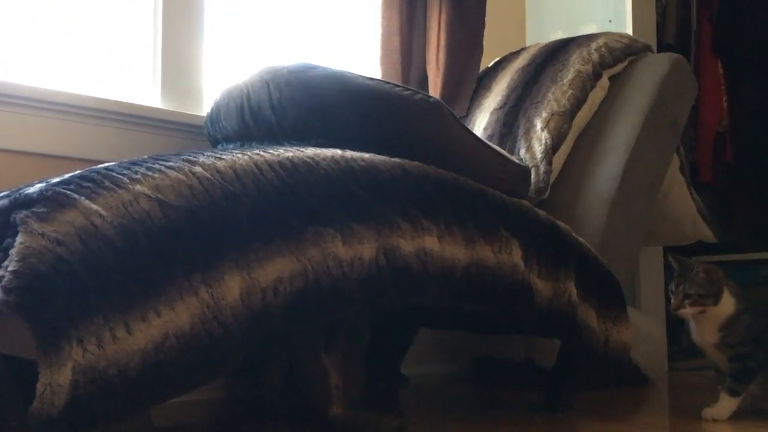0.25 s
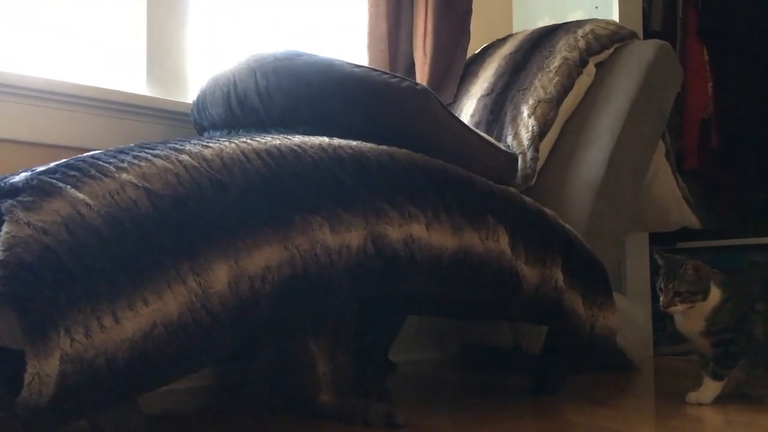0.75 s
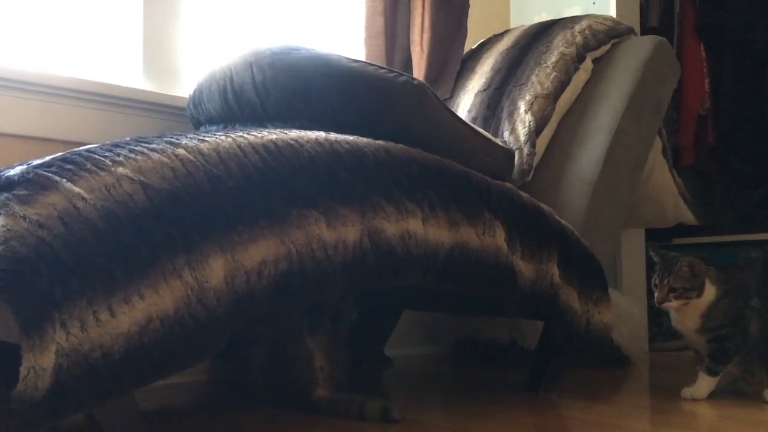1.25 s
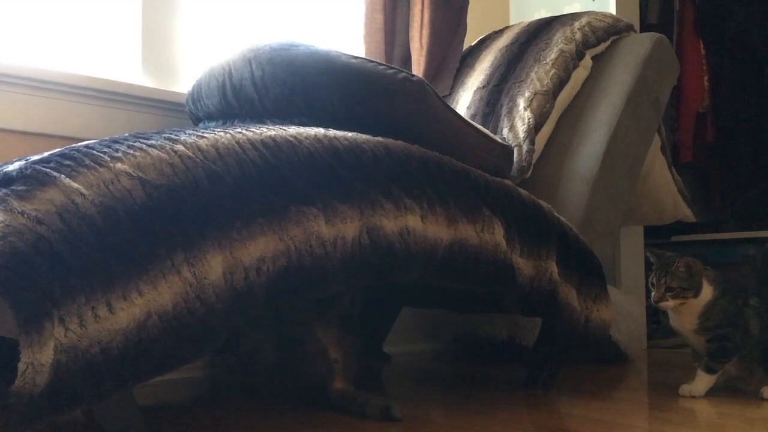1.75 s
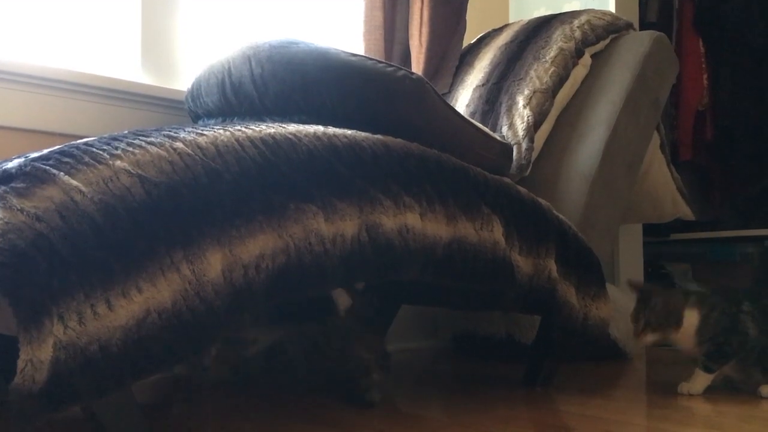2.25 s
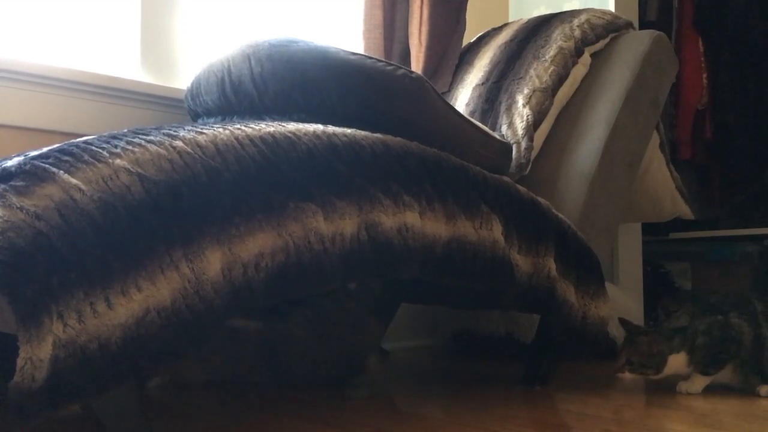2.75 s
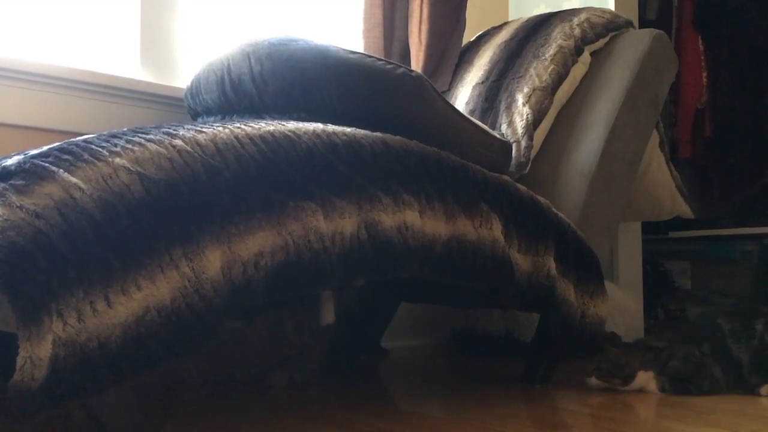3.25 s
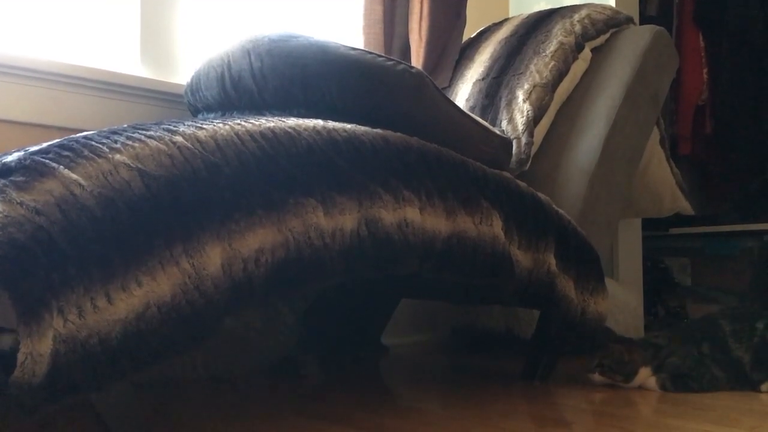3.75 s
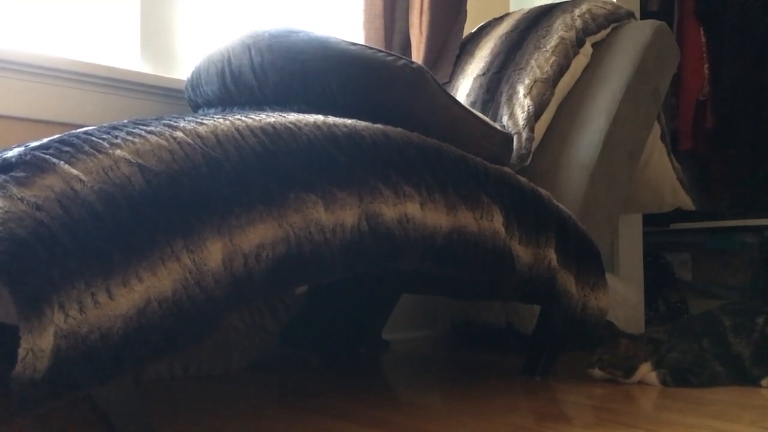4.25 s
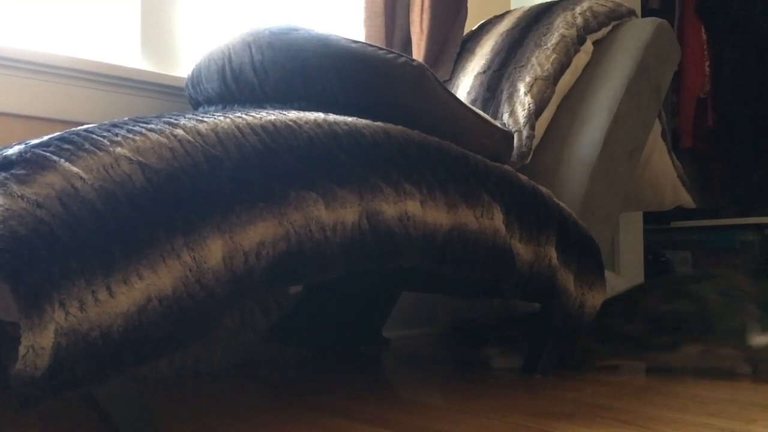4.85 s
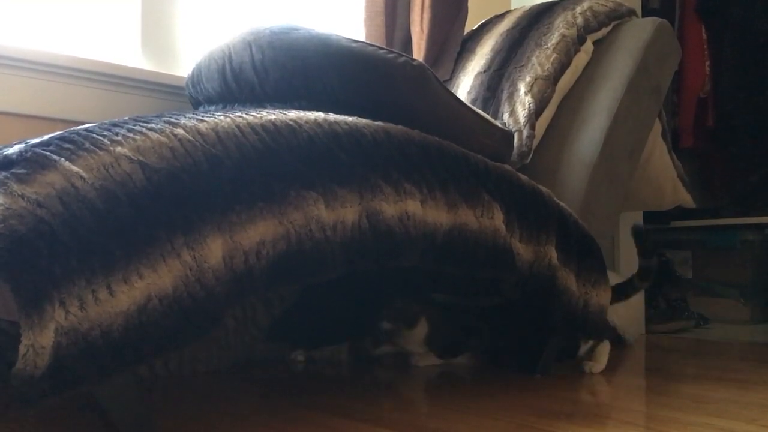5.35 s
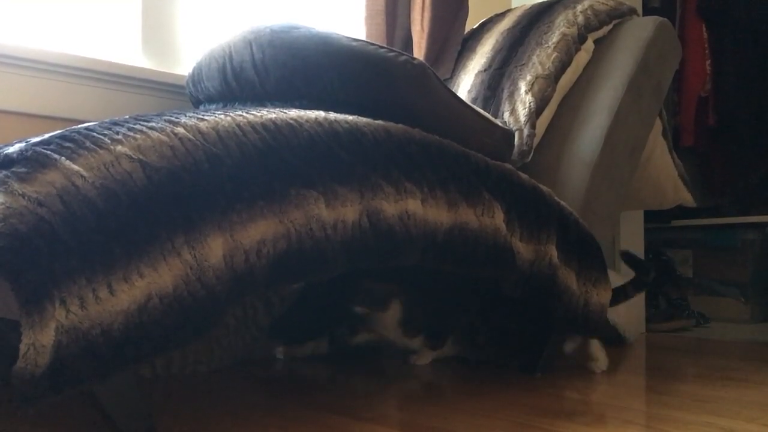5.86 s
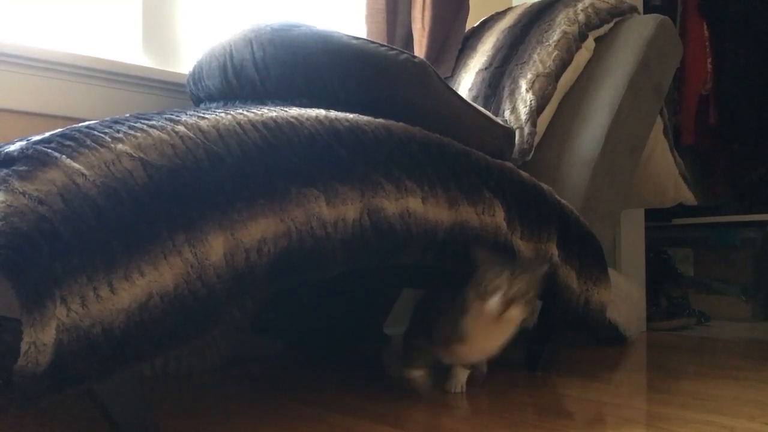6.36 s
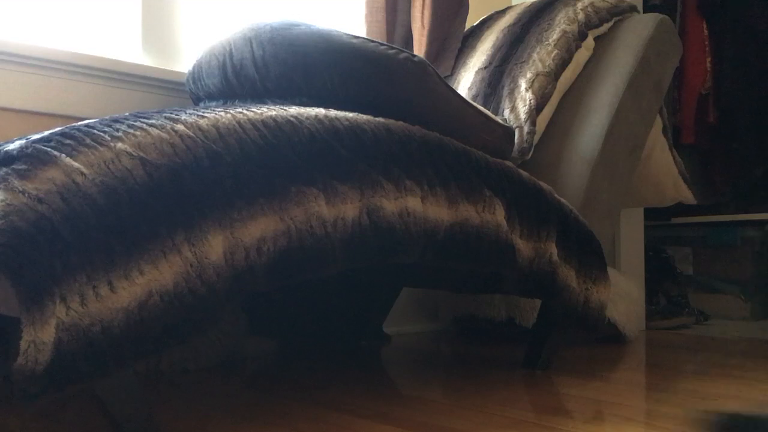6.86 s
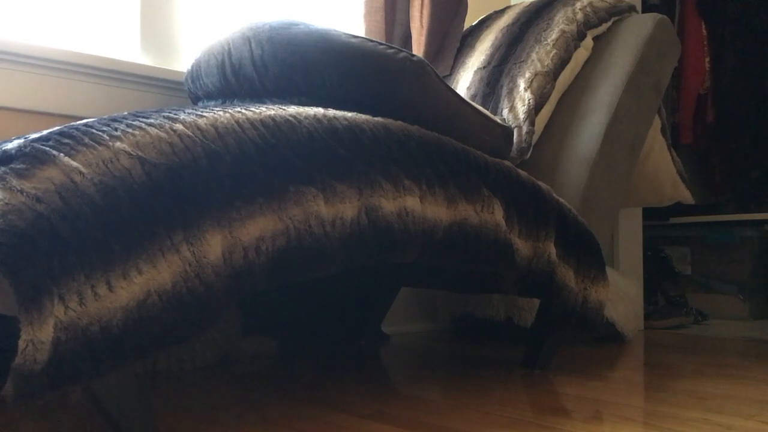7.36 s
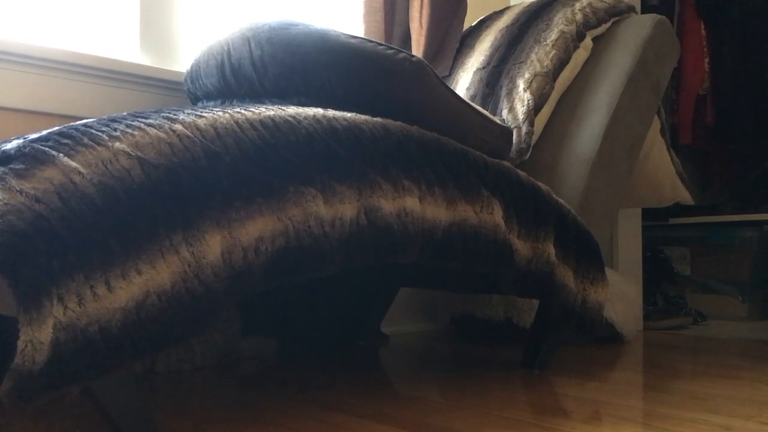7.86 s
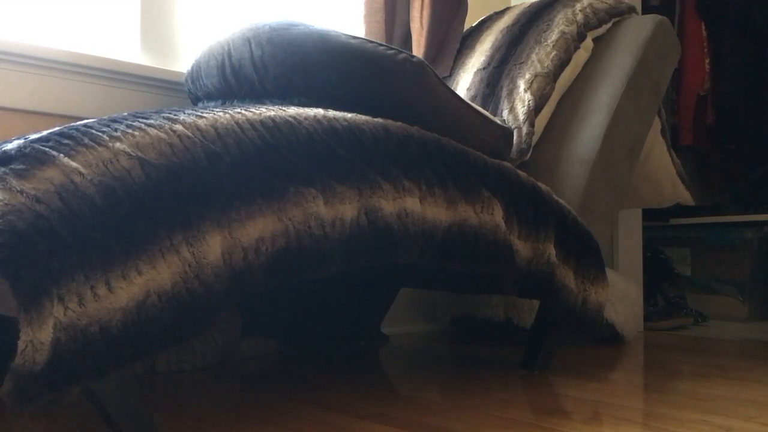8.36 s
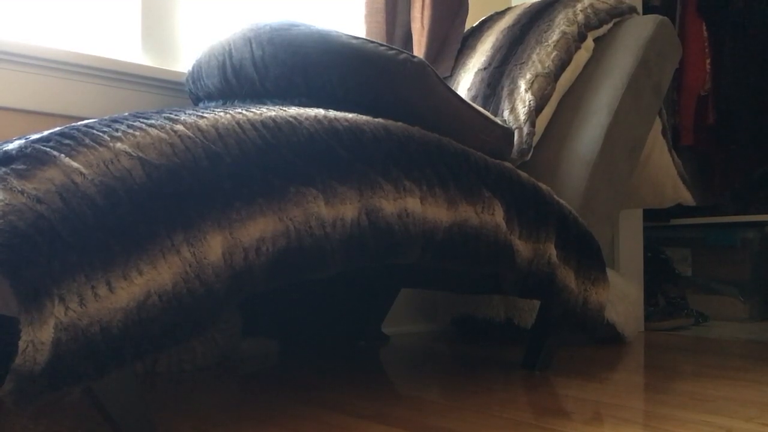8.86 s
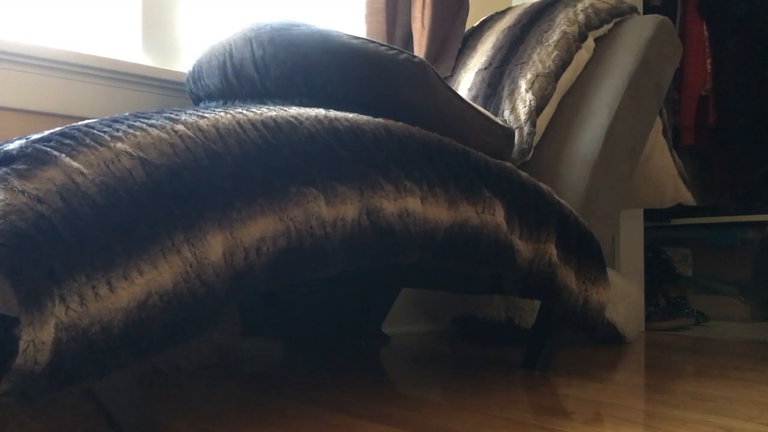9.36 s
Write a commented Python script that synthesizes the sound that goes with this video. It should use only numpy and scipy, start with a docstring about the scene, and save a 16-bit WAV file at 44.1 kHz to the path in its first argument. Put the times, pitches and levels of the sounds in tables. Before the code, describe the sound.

Close, soft scuffling of cats on wooden boards, with muffled bumps, claw clicks and brushing fur coming in bursts, then near stillness.

```python
"""Two cats tussle on a hardwood floor under a couch, close to a microphone, in a small quiet room.
Rumble and hiss (shaped noise) run throughout; strokes of fur and pads (swelling noise), thuds of the joists
(sagging cycles) and paw knocks (falling chirps with a room tail) begin at once. Claw ticks (filtered clicks
with a gritty skid) join before 2 s and one thin squeak (a wobbling tone) comes near 3 s. The tussle crowds
around 5 s and from 6 to 7.7 s; then come small shifts of weight and, after 9.3 s, a few last touches."""
import sys
import numpy as np
from scipy import signal
from scipy.fft import rfft, irfft
from scipy.io import wavfile
from scipy.ndimage import uniform_filter1d

SR = 44100
rng = np.random.default_rng(int(sys.argv[2]) if len(sys.argv) > 2 else 0)


def waveform_to_disk(signal):
    """Save audio, clipped to [-1, 1], as 16-bit WAV at the path in sys.argv[1]."""
    frames = np.transpose(np.atleast_2d(signal))
    scaled = np.clip(frames, -1, 1) * 32767
    samples = np.round(scaled).astype(np.int16)
    wavfile.write(sys.argv[1], SR, samples)


N = 423360


def gain_of(db):
    """Amplitude ratio: 20 dB is a factor of ten."""
    return 10 ** (np.asarray(db) / 20)


def evened(x):
    """Power normalisation: scales to rms 1."""
    return x / np.sqrt(np.mean(x ** 2) + 1e-20)


def read(points, hz):
    """Interpolation along a logarithmic frequency axis."""
    point_hz, value = np.transpose(points)
    return np.interp(np.log(hz + 1), np.log(point_hz + 1), value)


def add(mix, s, sound):
    """Linear superposition: mixes a sound in from time s."""
    part = mix[max(round(s * SR), 0):][:len(sound)]
    part += sound[:len(part)]


def coloured(x, spectrum):
    """Zero-phase filtering: multiplies the Fourier transform of x by a spectrum in dB."""
    bin_hz = np.fft.rfftfreq(len(x), 1 / SR)
    return irfft(rfft(x) * gain_of(read(spectrum, bin_hz)), len(x))


def flicker(span_s, depth_db):
    """Amplitude modulation: a random gain of rms depth_db that changes within about span_s."""
    size = round(span_s * SR)
    smooth = uniform_filter1d(uniform_filter1d(rng.standard_normal(N), size), size)
    return gain_of(depth_db * evened(smooth))


def rumble_db(t):
    """Slow envelope: level of the rumble at times t, linear in dB between points."""
    # low rumble of the house and of small movements: (time [s], level [dB])
    rumble_levels = [(0.0, -69), (0.35, -61), (1.2, -62.5), (1.6, -77), (1.95, -68), (2.32, -67.5),
                     (3.02, -54), (4.3, -70), (4.85, -62), (5.05, -47.5), (5.43, -62), (5.8, -65),
                     (6.26, -55.5), (7.25, -55.5), (7.75, -55), (7.95, -60), (8.37, -62.5), (9.6, -63)]
    return np.interp(t, *np.transpose(rumble_levels))


def background():
    """Spectral shaping of noise: a lumpy low rumble over a steady hiss."""
    # power balance of the rumble: (frequency [Hz], level [dB per Hz])
    rumble_shape = [(20, -42), (40, 6.5), (70, 6.5), (110, 4.5), (180, 5.5), (260, -13.5), (400, -43.5)]
    # still air and microphone: (frequency [Hz], level [dB])
    hiss_shape = [(24, -34.5), (40, -3.5), (66, -15.5), (156, -7), (358, -17.5), (523, -23), (1060, -29),
                  (1890, -31), (5050, -35.5), (6500, -35), (10500, -39.5), (11900, -39.5), (15300, -42),
                  (16500, -60)]
    hiss_db = -70
    rumble = evened(coloured(rng.standard_normal(N), rumble_shape) * flicker(0.027, 2.0))
    hiss = evened(coloured(rng.standard_normal(N), hiss_shape))
    return gain_of(rumble_db(np.arange(N) / SR)) * rumble + gain_of(hiss_db) * hiss


def boards(x):
    """Modal resonance of the floor boards: each mode has peak gain 1 before its own level."""
    # modes of the boards: (frequency [Hz], bandwidth [Hz], level [dB])
    modes = [(335, 25, -8), (450, 160, 0), (551.4, 45, 11.5), (847, 34, -5.5), (1160, 14, -9),
             (1590, 13, -12), (2060, 24, -16.5)]
    ringing = 0
    for hz, width_hz, db in modes:
        b, a = signal.iirpeak(hz, hz / width_hz, SR)
        ringing = ringing + gain_of(db) * signal.lfilter(b, a, x)
    return ringing


def slides():
    """Stick-slip friction: dense tiny slips ring the boards, scrape, and hiss in the fur with each stroke."""
    # strokes of fur and pads: (time of the peak [s], half length [s], ringing of the boards [dB],
    # scrape [dB], hiss of the fur [dB])
    strokes = [(0.21, 0.086, -67, -93, -85), (1.956, 0.041, -57.5, -100, -67),
               (2.472, 0.046, -73, -81, -69), (2.58, 0.022, -66, -81, -84), (2.664, 0.045, -73, -80, -75),
               (2.935, 0.089, -78, -78.5, -80), (3.27, 0.037, -59.5, -82, -85),
               (3.51, 0.054, -67, -102, -80.5), (3.614, 0.063, -67.5, -87, -71.5),
               (3.942, 0.033, -67.5, -79, -80.5), (4.729, 0.023, -63, -91, -91),
               (4.868, 0.031, -67, -73, -78), (5.024, 0.025, -59, -72, -77), (5.13, 0.016, -80, -84, -94),
               (5.364, 0.023, -60.5, -70, -88), (5.958, 0.037, -97, -75.5, -71),
               (6.022, 0.02, -75, -71, -68), (6.2, 0.022, -66.5, -89, -101), (6.28, 0.065, -77, -80, -70.5),
               (6.38, 0.029, -60, -78, -63), (6.445, 0.018, -53, -70, -89), (6.52, 0.026, -58.5, -84, -81),
               (6.744, 0.041, -71, -74, -76), (6.86, 0.034, -80, -70, -81), (7.064, 0.0079, -60, -85, -99),
               (7.138, 0.033, -62, -69, -85), (7.269, 0.032, -62, -94, -91), (7.381, 0.024, -71, -73, -94),
               (7.643, 0.039, -71.5, -75, -73), (7.757, 0.048, -55, -67, -100),
               (9.362, 0.024, -68, -80, -78), (9.59, 0.033, -83, -80, -75)]
    # colour of scraping pads and claws: (frequency [Hz], level [dB per Hz])
    scrape_shape = [(500, -41), (1000, 2.5), (1600, 8.5), (2200, 5.5), (3300, 0), (4500, -4), (7000, -58)]
    # colour of sliding fur: (frequency [Hz], level [dB per Hz])
    fur_shape = [(2500, -8), (4500, 3.5), (6500, -0.5), (9000, 4), (10500, -5), (12500, -0.5),
                 (16000, -2.5)]
    rise, fall = 0.85, 1.26  # shares of the half length: a stroke starts quicker than it fades
    levels = np.zeros((3, N))
    for s, half, *layers_db in strokes:
        u = np.arange(-2 * half, 3 * half, 1 / SR)
        swell = np.exp(-(u / (half * np.where(u < 0, rise, fall))) ** 2)
        for level, db in zip(levels, layers_db):
            add(level, s - 2 * half, gain_of(db) * swell)
    # noise of strongly uneven strength: a few slips stand out
    slips = rng.standard_normal(N) * gain_of(5.2 * np.minimum(rng.exponential(1, N), 5))
    gusts = flicker(.004, 2.)
    layers = boards(slips), coloured(slips, scrape_shape) * gusts, coloured(slips, fur_shape) * gusts
    return sum(level * evened(layer) for level, layer in zip(levels, layers))


def shifts(count):
    """Uniform random scatter: small shifts of weight at random moments, which grow with the rumble."""
    over_rumble_db, spread_db = 8.5, 5
    low_hz, high_hz, short_s, long_s = 64, 126, 0.0035, 0.027
    when, size, pitch, span = rng.random((count, 4)).T
    s = when * N / SR
    db = rumble_db(s) + over_rumble_db + spread_db * (2 * size - 1)
    hz = low_hz * (high_hz / low_hz) ** pitch
    return list(zip(s, db, hz, short_s + (long_s - short_s) * span))


def thuds():
    """Damped flexure of the floor: a few soft cycles swell, then fade, the pitch sagging as slow waves arrive."""
    # clear bumps of a cat's weight: (time of the peak [s], level [dB], pitch at the peak [Hz], length [s])
    bumps = [(0.166, -49, 92, 0.014), (0.219, -41, 108, 0.02), (0.28, -30.5, 84, 0.017),
             (0.38, -36.5, 90, 0.021), (0.475, -43.5, 90, 0.018), (0.634, -47, 90, 0.025),
             (0.765, -44.5, 84, 0.011), (0.808, -47, 148, 0.0062), (0.913, -46, 87, 0.03),
             (1.108, -47, 72.5, 0.068), (1.18, -34.5, 86, 0.014), (1.784, -47.5, 89.5, 0.019),
             (2.394, -39, 100, 0.031), (2.805, -41, 99, 0.035), (3.063, -38, 130, 0.01),
             (3.577, -36.5, 103, 0.022), (3.613, -46.5, 80, 0.04), (3.958, -46, 86.5, 0.052),
             (4.63, -47.5, 113, 0.056), (4.905, -32, 101, 0.01), (4.934, -35, 87.4, 0.032),
             (5.039, -40.5, 96, 0.021), (5.076, -29, 76, 0.027), (5.125, -31, 84, 0.024),
             (5.198, -43, 76, 0.039), (5.244, -39.5, 99, 0.024), (5.281, -46.5, 94, 0.048),
             (6.043, -36.5, 81, 0.034), (6.11, -37, 80.4, 0.025), (6.154, -42.5, 103, 0.026),
             (6.202, -46.5, 92.5, 0.074), (6.317, -41.5, 149, 0.02), (6.337, -46, 88, 0.0093),
             (6.42, -30.5, 102, 0.022), (6.485, -38, 76, 0.091), (6.518, -38, 171, 0.016),
             (6.632, -41, 131.4, 0.011), (6.709, -34.5, 165, 0.02), (6.855, -40, 184, 0.034),
             (7.013, -42, 100, 0.017), (7.068, -36.5, 115, 0.05), (7.15, -31, 123, 0.011),
             (7.301, -25.5, 84.6, 0.025), (7.351, -39.5, 82.4, 0.037), (7.407, -40, 72.6, 0.019),
             (7.526, -45.5, 112, 0.059), (7.665, -44.5, 109, 0.008), (9.36, -47.5, 109, 0.015)]
    rows = shifts(count=90) + bumps
    turns = rng.uniform(-.12, .12, len(rows))  # phase [cycles]: the strongest swing is mostly a push
    out = np.zeros(N)
    for (s, db, hz, length), turn in zip(rows, turns):
        u = np.arange(-2 * length, 3 * length, 1 / SR)
        shape = np.exp(-(u / (length * np.where(u < 0, .5, .75))) ** 2)
        cycles = hz * u * (1 - 0.18 * u / length) + turn
        add(out, s - 2 * length, gain_of(db) * shape * np.cos(2 * np.pi * cycles))
    return out


def knocks():
    """Dispersion of bending waves: the treble arrives first, so each blow is a quick falling chirp."""
    # paws strike the boards: (time [s], level [dB], pitch near the peak [Hz])
    blows = [(0.158, -46.5, 226), (0.196, -50.5, 387), (0.226, -41.5, 225), (0.27, -33.5, 227),
             (0.361, -33.5, 254), (0.747, -55, 213), (0.799, -54.5, 243), (1.147, -44.5, 218),
             (1.752, -49, 335), (2.095, -58.5, 581), (2.375, -41.5, 390), (2.6, -55.5, 370),
             (3.001, -40, 327), (3.054, -41, 340), (3.218, -50, 423), (3.25, -38, 322), (3.607, -53.5, 505),
             (3.848, -55, 246), (3.935, -49.5, 240), (4.608, -48.5, 293), (4.862, -51, 456),
             (4.991, -58, 510), (5.108, -47, 315), (5.359, -47.5, 238), (6.07, -46.5, 232),
             (6.097, -45.5, 395), (6.123, -44, 380), (6.182, -48.5, 314), (6.307, -45, 340),
             (6.401, -41, 225), (6.508, -43.5, 211), (6.614, -46.5, 213), (6.696, -47, 230),
             (6.724, -47, 205), (6.822, -35.5, 233), (6.875, -43, 334), (6.995, -49.5, 264),
             (7.051, -39, 220), (7.123, -46, 285), (7.26, -47.5, 360), (9.314, -53.5, 275),
             (9.543, -45.5, 400)]
    # feed to boards and room, against the blow itself: (time [s], level [dB])
    knock_tail = [(0.2, -1.5), (0.3, -18), (1.2, -12), (1.7, -1), (3.1, -6), (4.8, 1.5), (6.1, -4),
                  (7.3, 6.5), (9.5, -0.5)]
    dry, wet = np.zeros((2, N))
    for s, db, hz in blows:
        cycles = np.arange(0, 7 / hz, 1 / SR) * hz  # time in periods of the listed pitch
        phase = 1.97 * np.log1p(cycles / 0.932)
        shape = cycles * np.exp(1 - cycles / 1.067) / 0.91
        blow = -gain_of(db) * shape * np.sin(2 * np.pi * phase)
        tail_db = np.interp(s, *np.transpose(knock_tail))
        add(dry, s + 0.00223, blow)  # the swing starts just after the touch
        add(wet, s + 0.002223, gain_of(tail_db) * blow)
    return dry + gain_of(-8.0) * boards(wet), wet


def room(x):
    """Reverberation: sparse taps of random sign, each band dying at its own speed."""
    # reverberation time: (frequency [Hz], time to fall by 60 dB [s])
    decay_times = [(150, 0.21), (500, 0.19), (2000, 0.24), (6000, 0.18), (15000, 0.051)]
    taps = np.zeros((3, SR // 2))
    at = np.arange(120, SR // 2 - 20, 20)
    places = at + rng.integers(0, 20, (3, len(at)))  # one reflection in every 20 samples
    np.put_along_axis(taps, places, rng.choice([-1., 1.], (3, len(at))), 1)
    hz, t, bands = signal.stft(taps, SR, nperseg=256)
    decay = gain_of(-60 * t / read(decay_times, hz)[:, None])
    tails = signal.istft(bands * decay, SR, nperseg=256)[1]
    # three tails take turns at a steady rate, so that the reverberation varies from touch to touch
    turns = np.cos(np.pi * (7 * np.arange(N) / SR + np.arange(3)[:, None] / 3)) * np.sqrt(2 / 3)
    return signal.fftconvolve(x * turns, tails / np.linalg.norm(tails[0]), axes=1).sum(0)[:N]


def ticks():
    """Impact and friction: a sharp touch, then a gritty skid, longer for duller claws. Dry part and room feed."""
    # claws on the varnish: (time [s], level of the middle [dB], woody part above it [dB],
    # bright part above it [dB])
    touches = [(1.7516, -54, 10.5, 5.5), (1.965, -58.5, -4, 23), (1.9799, -39.5, -4.5, 7.5),
               (1.9926, -44, 3, 4), (2.0864, -40, -7, -7), (2.0963, -53.5, 11, 15.5),
               (2.3785, -41.5, 3.5, -5), (2.3997, -50, 1, -6), (2.4787, -59, 2.5, -4),
               (2.6221, -45.5, -8, 0), (2.7024, -58, 1, -2), (2.7329, -52, 5.5, 6), (3.0015, -42, 6, -1.5),
               (3.0548, -49, 4, -5), (3.1066, -59, 0.5, -15), (3.221, -58, 11, 5), (3.2495, -35.5, 7, 1.5),
               (3.608, -53.5, 1, 6), (3.9282, -58.5, 13.5, -2), (4.6088, -62, 5.5, -9),
               (4.8642, -59.5, 4, 7), (4.889, -57.5, 8, -17.5), (4.9616, -40.5, -17.5, -7),
               (4.9921, -39.5, -5, -23), (5.0536, -54, -1, 1), (5.0736, -55.5, 12, -32),
               (5.107, -52.5, -2, -26), (5.2113, -48, -9, -20), (5.3417, -61, 8, 1), (5.3559, -60, 15.5, 9),
               (5.9325, -47, -17, -12), (6.0201, -44.5, -10, -11), (6.0727, -53.5, -4, -2),
               (6.0983, -54, 3.5, -3), (6.122, -52.5, -16, -1), (6.182, -67.5, 21, -12),
               (6.3074, -57.5, 14, -25), (6.318, -44, -7, -16), (6.3565, -41.5, -16, -13),
               (6.3665, -34, -6.5, -17.5), (6.389, -39, -5, -15), (6.436, -57.5, 10, -19),
               (6.4494, -63, -1, -20), (6.506, -51.5, 0.5, -16.5), (6.5803, -50, -6, -10),
               (6.7056, -58, 6, 3.5), (6.7495, -55.5, -8, -4), (6.8256, -48, -0.5, -6),
               (6.8462, -35.5, -8.5, -1.5), (7.047, -64, 19.5, -9), (7.1129, -40, -4, 1.5),
               (7.2639, -59, -8, -12)]
    # middle, woody and bright band: (centre [Hz], gain that spreads the peak over the band [dB])
    claw_bands = [(3310, 14), (1450, 18), (8500, 9.5)]
    (middle_hz, middle_db), (woody_hz, woody_db), (bright_hz, bright_db) = claw_bands
    touch_height, skid_db, drag_base_s = 0.38, -11, 0.0011
    tail_base_db, tail_per_woody = -7.5, -0.065  # the room feed falls with each dB of the woody part
    lead, t = 128, np.arange(896) / SR  # silent samples ahead of the touch, time after it
    grit = rng.standard_normal((len(touches), len(t)))
    # every tick has random peaks and dips in its colour
    lumps_hz = np.geomspace(600, 12000, 30)
    lumps_db = 3 * rng.standard_normal((len(touches), len(lumps_hz)))
    lumps_db = lumps_db - lumps_db.mean(1, keepdims=True)
    out = np.zeros((2, N))
    for (s, db, woody, bright), skid, lump_db in zip(touches, grit, lumps_db):
        lumps = list(zip(lumps_hz, lump_db))
        drag_s = drag_base_s * gain_of(-.75 * np.clip(bright, -22, 4))
        skid_tail = gain_of(skid_db) * skid[1:] * np.exp(-t[1:] / drag_s)
        crack = np.r_[np.zeros(lead), touch_height, skid_tail]
        # the same energy in one click feeds the room
        click = np.linalg.norm(crack) * (np.arange(len(crack)) == lead)
        colour = [(150, woody - 30), (500, woody + woody_db), (woody_hz, woody + woody_db),
                  (middle_hz, middle_db), (bright_hz, bright + bright_db), (16000, bright + bright_db - 8.0)]
        tail_db = tail_base_db + tail_per_woody * woody
        add(out[0], s - lead / SR, gain_of(db) * coloured(coloured(crack, colour), lumps))
        add(out[1], s - lead / SR, gain_of(db + tail_db) * coloured(coloured(click, colour), lumps))
    return out


def squeak():
    """Frequency modulation: a pad squeaks once, a thin husky tone that swells, wobbles and fades."""
    start_s, length_s, level_db = 2.955, 0.045, -68
    centre_hz, wobble_hz, wobbles_per_s = 1850, 80, 30
    t = np.arange(N) / SR - start_s
    hz = centre_hz - wobble_hz * np.cos(2 * np.pi * wobbles_per_s * t)
    tone = np.sin(2 * np.pi * np.cumsum(hz) / SR) * flicker(.0015, 4.)
    swell = np.sqrt(abs(np.sin(np.pi * np.clip(t / length_s, 0, 1)))) * (t < length_s)
    return gain_of(level_db) * tone * swell


def scene():
    """Superposition of all sources; the room answers knocks and ticks."""
    blows, blows_wet = knocks()
    clicks, clicks_wet = ticks()
    clicks = clicks + gain_of(-12.5) * boards(clicks)  # claws set the wood ringing too
    wet = room(blows_wet + clicks_wet)
    return (background() + slides() + thuds() + blows + wet + clicks + squeak())[None]


def record(dry):
    """Band limitation: a linear-phase low-pass at the upper edge of the recorder."""
    edge_hz = 16000
    lowpass = signal.firwin(255, edge_hz, window=("kaiser", 9), fs=SR)
    return signal.oaconvolve(dry, lowpass[None], "same")


dry = scene()
out = record(dry)
waveform_to_disk(out)
```